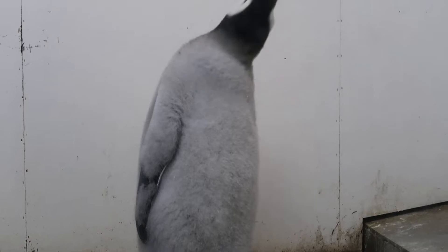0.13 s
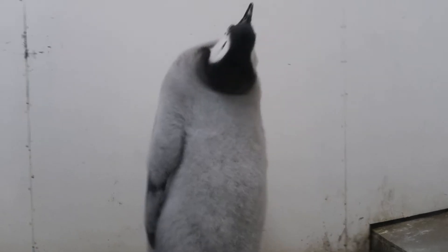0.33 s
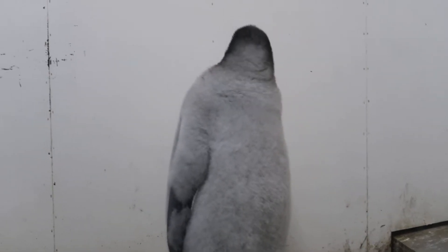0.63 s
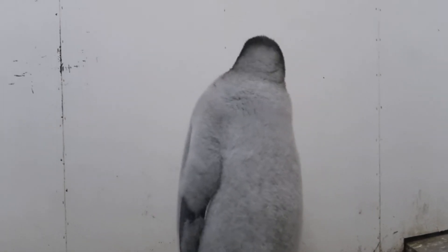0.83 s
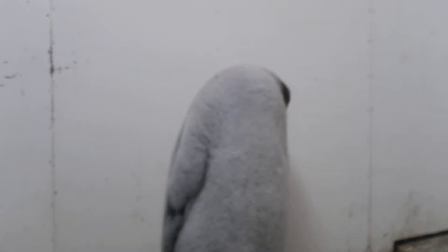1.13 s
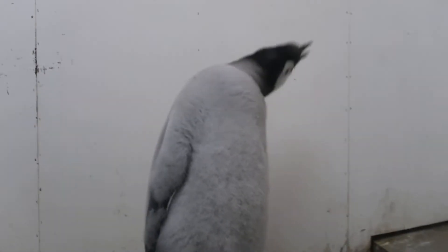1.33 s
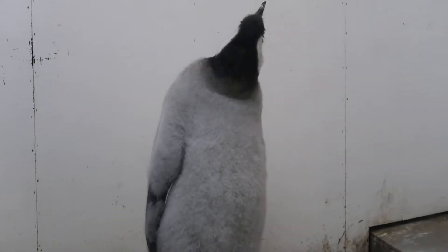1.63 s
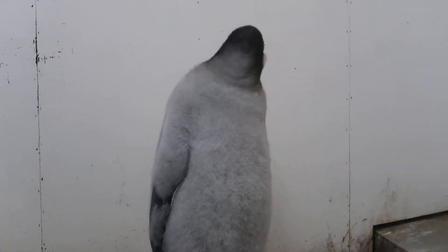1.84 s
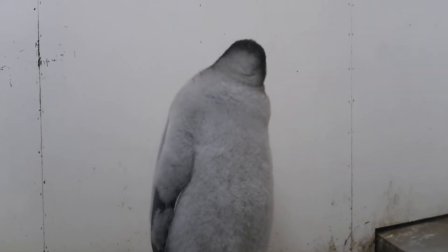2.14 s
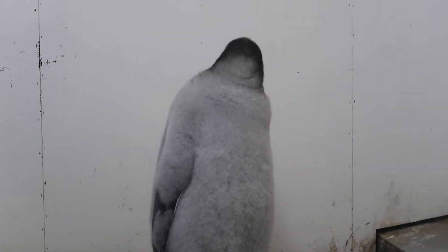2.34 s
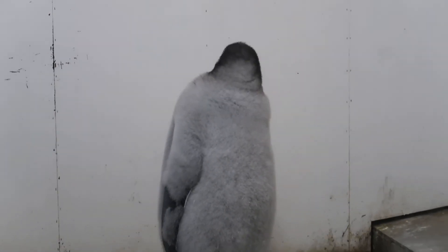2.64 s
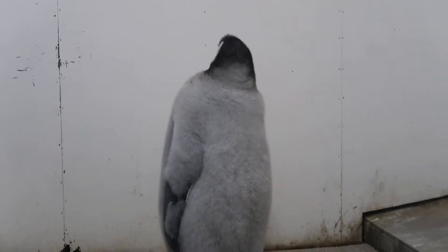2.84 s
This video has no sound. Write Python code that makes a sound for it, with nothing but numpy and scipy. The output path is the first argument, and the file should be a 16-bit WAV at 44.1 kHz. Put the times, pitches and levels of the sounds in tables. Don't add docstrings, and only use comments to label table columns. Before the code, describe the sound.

A penguin chick gives two warbling whistled calls in a small, hard-walled, echoing room with fan hum

```python
import sys
import numpy as np
from scipy import signal
from scipy.fft import rfft, irfft, next_fast_len
from scipy.io import wavfile
from scipy.ndimage import uniform_filter1d, map_coordinates

SR = 44100
rng = np.random.default_rng(int(sys.argv[2]) if len(sys.argv) > 2 else 0)


def master(y):
    cut = np.clip(np.atleast_2d(y).T, -1, 1)
    pcm = np.round(cut * 32767)
    wavfile.write(sys.argv[1], SR, pcm.astype(np.int16))


def boost_factor(decibels):
    exponent = np.asarray(decibels, float) / 20
    return 10 ** exponent


N = 131418
T = np.arange(N) / SR
LEAD = SR // 10
LOW_SIDE_DB = -26


def unit(x):
    return x / np.sqrt(np.mean(x ** 2) + 1e-20)


def along(points, hz):
    f, v = np.transpose(points)
    return np.interp(np.log(hz + 1), np.log(f + 1), v)


def wobble(rate, size=N):
    knots = rng.standard_normal(int(size * rate / SR) + 4)
    return map_coordinates(knots, [np.arange(size) * rate / SR])


def filtered(x, response):
    size = next_fast_len(x.shape[-1] + SR // 2)
    spectrum = rfft(x, size) * response(np.fft.rfftfreq(size, 1 / SR))
    return irfft(spectrum, size)[..., :x.shape[-1]]


# freq_hz, side_minus_mid_db
WIDTH = [(40, -37), (130, -49), (350, -18.5), (700, -19), (1500, -12), (3000, -6.5), (5000, 0.7), (9000, 4),
         (14000, 3)]


def rush(spectrum, patchy_db):
    z = signal.stft(rng.standard_normal((2, N)), nperseg=512)[2]
    patches = uniform_filter1d(rng.standard_normal(z.shape[1:]), size=8, axis=0)
    patches = uniform_filter1d(patches, size=12, axis=1)
    pair = signal.istft(z * boost_factor(patchy_db * unit(patches)), nperseg=512)[1][:, :N]
    pair = filtered(pair, lambda hz: boost_factor(along(spectrum, hz) + [0 * hz, along(WIDTH, hz)]))
    return pair / pair[0].std()


# freq_hz, density_db_per_hz
FAN = [(15, -11.5), (60, -7), (130, -0.5), (260, -10), (550, -14.5), (1100, -21.5), (2000, -28.5),
       (3300, -39), (5200, -65)]
# time_s, air_db, motor_hum_db
BLOW = [(.08, -36.5, -29), (0.299, -37.5, -29.5), (.6, -37, -29.5), (1.1, -37, -39.5), (1.2, -36, -31),
        (1.45, -37, -48.5), (1.7, -35.5, -37), (1.9, -35, -29), (2.3, -36.5, -33), (2.97, -37, -37.5)]
# freq_hz, width_hz, level_db
TONES = [(61.5, 6.08, -45.5), (87.3, 8.1, -49), (165.3, 15, -43.5), (207.7, 6.02, -46),
         (285.1, 8.34, -44.5), (377, 10, -51), (490.4, 7.9, -56.5), (569.7, 9.74, -52.5)]


def fan():
    s, air_db, hum_db = np.transpose(BLOW)
    swell_db = np.interp(T, s, air_db - air_db.mean()) + 0.24 * wobble(6.79) + 0.99 * wobble(14)
    out = boost_factor(-30 + swell_db) * rush(FAN, patchy_db=1.0)
    motor_hum = (118.3, 3.05, np.interp(T, s, hum_db) - 3.0)
    for hz, width_hz, db in TONES + [motor_hum]:
        phase = 2 * np.pi * np.cumsum(hz + width_hz * wobble(9) / 2) / SR
        tone = np.array([np.sin(phase), boost_factor(LOW_SIDE_DB) * np.cos(phase)])
        out += boost_factor(db + 4.0 + 2.43 * wobble(6.75)) * tone
    return out


# freq_hz, density_db_per_hz
HISS = [(1500, -23), (4000, 9), (6300, 1.5), (10000, -10.5), (13000, -18.5), (15000, -24), (16000, -36)]
# time_s, level_db
HUSH = [(.08, 1), (.45, -0.5), (1.0, -0.3), (1.17, 0), (1.22, 0), (1.3, -4.5), (1.51, -12), (1.55, 1.2),
        (2.0, 0), (2.6, 0.6), (2.75, -3), (2.97, -3.5)]


def microphone_noise():
    hush_db = np.array([np.interp(T, *np.transpose(HUSH)), 0.48 * wobble(4)])
    out = boost_factor(-62 + hush_db) * rush(HISS, patchy_db=2.2)
    out[0] += boost_factor(-82.5) * np.sin(2 * np.pi * 13006 * T)
    return out


# time_s, length_s, level_db, centre_hz
RUSTLES = [(0.279, 0.0096, -75, 8286), (0.954, 0.013, -65, 5060), (1.086, .012, -59.5, 4960),
           (1.106, 0.017, -64, 8730), (1.134, 0.038, -76, 8850), (1.423, 0.0051, -63.5, 6900),
           (1.557, 0.018, -68, 4530), (2.083, .02, -70.5, 10000), (2.236, 0.027, -87.5, 7760),
           (2.473, .008, -70, 5405), (2.971, 0.005, -57.5, 5270)]


def rustles():
    octaves, side_db = 0.9, 4
    out = np.zeros((2, N))
    for s, length, db, hz in RUSTLES:
        noise = rng.standard_normal((2, N))
        noise = filtered(noise, lambda f: np.exp(-(np.log2(f / hz + 1e-9) / octaves) ** 2))
        puff = boost_factor(db + 4 * wobble(860)) * np.exp(-((T - s) / length) ** 2)
        out += puff * unit(noise) * boost_factor([[0], [side_db]])
    return out


# time_s, pitch_hz, level_db
BUMPS = [
    (.16, 39.5, -26),
    (0.276, 36.8, -22.5),
    (0.779, 44.7, -32),
]


def bumps():
    out = np.zeros((2, N))
    for s, hz, db in BUMPS:
        thud = np.exp(-((T - s) / 0.022) ** 2) * np.cos(2 * np.pi * hz * (T - s))
        out += boost_factor(db) * thud * boost_factor([[0], [LOW_SIDE_DB]])
    return out


# freq_hz, t60_s
ROOM = [(1000, 1), (1800, 0.73), (2800, 0.93), (5000, 0.6)]
# freq_hz, width_hz, level_db
STANDING = [(1716, 40, 2), (1847, 25, -1), (2028, 40, 0), (2455, 25, -1), (2715, 30, -5)]


def standing_waves(f):
    return 1 + sum(boost_factor(db) * 1j * f * w / (c * c - f * f + 1j * f * w) for c, w, db in STANDING)


def wall_tail():
    early_db, early_t60_s, side_db = 5.5, 0.043, -4.5
    hz, t, z = signal.stft(rng.standard_normal((2, SR)), SR, nperseg=256)
    fall = boost_factor(-60 * t / along(ROOM, hz)[:, None]) + boost_factor(early_db - 60 * t / early_t60_s)
    spread = boost_factor([0 * hz, along(WIDTH, hz) + side_db])[..., None]
    tail = signal.istft(z * fall * spread, SR, nperseg=256)[1]
    return tail / np.sqrt(np.mean(np.abs(rfft(tail[0])[1500:2500]) ** 2))


def room(x):
    delay_s, level_db = 0.003, 6
    turn = SR // 16
    x = np.pad(filtered(x, standing_waves), (round(delay_s * SR), turn))
    wet = np.zeros((2, len(x) + 2 * SR))
    fade = signal.windows.hann(2 * turn, sym=False) ** 0.5
    for k in [*range(7), *range(20, 28)]:
        at = k * turn
        piece = x[at:at + 2 * turn] * fade
        answer = signal.fftconvolve(piece[None], wall_tail(), axes=1)
        wet[:, at:at + answer.shape[1]] += answer
    return wet[:, :len(x)] * boost_factor(level_db)


# time_s, pitch_hz, level_db
PIP = [(0, 2380, -20), (.005, 2430, -9), (.011, 2600, -9), (0.016, 2900, -19), (.02, 2460, -13.5),
       (0.033, 2500, -18.5), (.05, 2400, -24), (0.075, 2760, -18), (.09, 2350, -7)]
DIP = [(0, 2374, -8), (.01, 2093, 0.5), (.021, 1810, -5), (.034, 1686, -1), (0.048, 1773, -10),
       (0.057, 2052, 3), (.062, 2680, -6), (0.07, 3155, -8), (.076, 3000, -50.5)]
ARCH = [(0, 2038, -20), (.02, 1754, -13.5), (.036, 2301, -6.5), (.047, 2044, -9), (.057, 1878, -0.5),
        (.066, 1741, -6.5), (.076, 1460, -9.5), (.1, 1955, -17), (0.119, 1805, -3)]
RISE = [(0, 1950, -22), (.012, 2023, -15.5), (.03, 2413, -12), (.038, 2879, -13), (.046, 2033, -5.5),
        (.057, 1711, -3.5), (0.062, 1425, -12), (0.079, 1288, -24.5), (.095, 1915, -18)]
TUMBLE = [(0, 1900, -9.5), (.012, 1583, -3.5), (.02, 2702, -9.5), (.032, 2297, -25), (.046, 1804, 0.5),
          (.056, 1694, -9), (.07, 1400, -9.5), (0.094, 1159, -22), (.11, 1300, -39)]
DROP = [(0, 2624, -13), (.014, 2640, -16.5), (0.021, 3152, -19.5), (.03, 1946, -7), (.044, 1683, -7.5),
        (.058, 1359, -12), (.085, 1800, -29), (.115, 1592, -14), (.13, 1490, -40)]
# start_s, syllable, pitch_factor, level_db
SUNG = [
    (-.015, PIP, 1.06, -15.5),
    (.068, DIP, 1.01, -19),
    (.143, RISE, 1.001, -20),
    (.238, TUMBLE, 0.95, -20),
    (1.243, PIP, 1, -17.5),
    (1.332, DIP, 1.001, -19.5),
    (1.397, ARCH, 0.98, -19),
    (1.512, DROP, 0.97, -18),
]
# multiple, level_db
OVERTONES = [(2, -21.5), (3, -33.5)]
# freq_hz, level_db
THROAT = [(1000, -4), (2000, -1.5), (2800, -2.5), (3400, 1), (4200, -8), (4600, -14), (5800, -15.5),
          (7000, -37)]


def chick():
    flutter_db, jitter, hoarse_db = 3.5, 0.016, 5
    t = np.arange(-LEAD, N) / SR
    out = np.zeros(len(t))
    level_flutter = flutter_db * wobble(250, size=len(t))
    pitch_jitter = 1 + jitter * wobble(300, size=len(t))
    hoarseness = boost_factor(hoarse_db * wobble(500, size=len(t)))
    for start, shape, factor, db in SUNG:
        s, hz, level = np.transpose(shape)
        on = (t > start) & (t < start + s[-1])
        u = t[on] - start
        phase = 2 * np.pi * np.cumsum(factor * np.interp(u, s, hz) * pitch_jitter[on]) / SR
        overtones = sum(boost_factor(g) * np.sin(k * phase) for k, g in OVERTONES)
        tone = np.sin(phase) + hoarseness[on] * overtones
        edge = np.clip(np.minimum(u, s[-1] - u) / 0.003, 0, 1)
        out[on] += edge * boost_factor(db + np.interp(u, s, level) + level_flutter[on]) * tone
    return filtered(out, lambda f: boost_factor(along(THROAT, f)))


def scene():
    pan_db = 0.57
    voice = chick()
    heard = room(voice)[:, :len(voice)] + voice * [[1], [0]]
    mid, side = heard[:, LEAD:]
    bird = np.array([mid + side, mid - side]) * boost_factor([[pan_db], [-pan_db]])
    mid, side = fan() + microphone_noise() + rustles() + bumps()
    return bird + [mid + side, mid - side]


def band_limit(x):
    return signal.sosfilt(signal.butter(12, 15150, fs=SR, output="sos"), x)


def record(dry):
    start_s, offset_db, settle_s, lowcut_hz = 0.0821, -17, 0.014, 20
    since = T - start_s
    u = np.clip(since, 0, 1) / settle_s
    offset = boost_factor(offset_db) * u * np.exp(1 - u)
    x = filtered(dry - offset, lambda hz: 1j * hz / (1j * hz + lowcut_hz))
    mix = x * np.clip(since / 0.00089, 0, 1)
    return band_limit(mix)


dry = scene()
out = record(dry)
master(out)
```